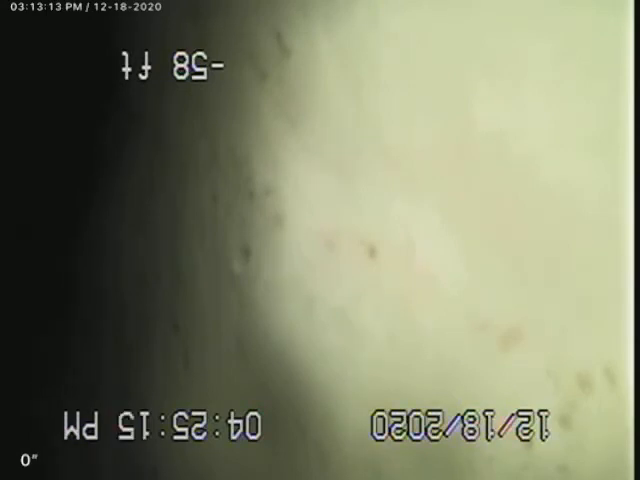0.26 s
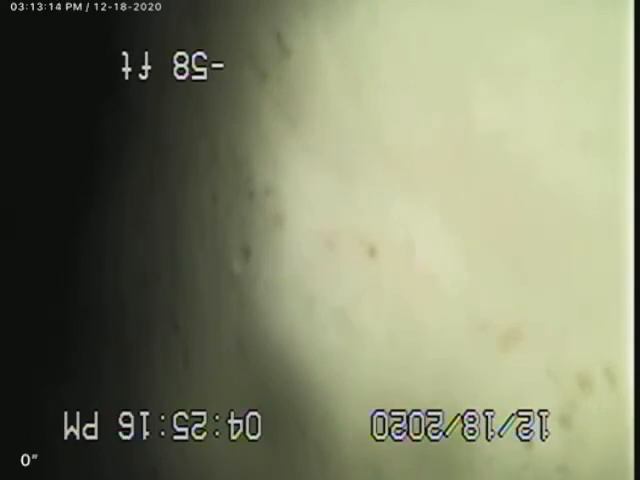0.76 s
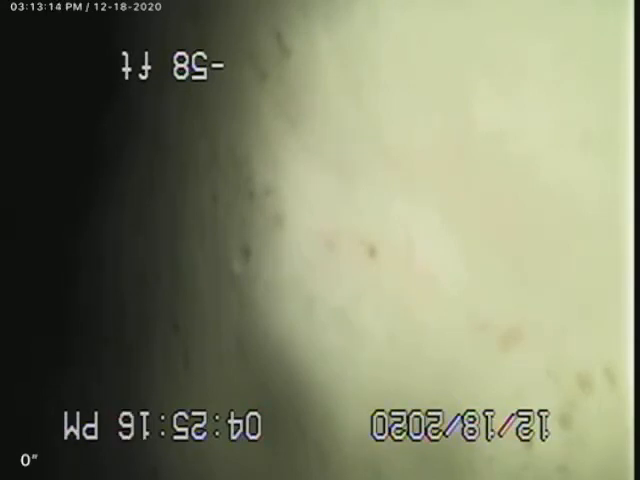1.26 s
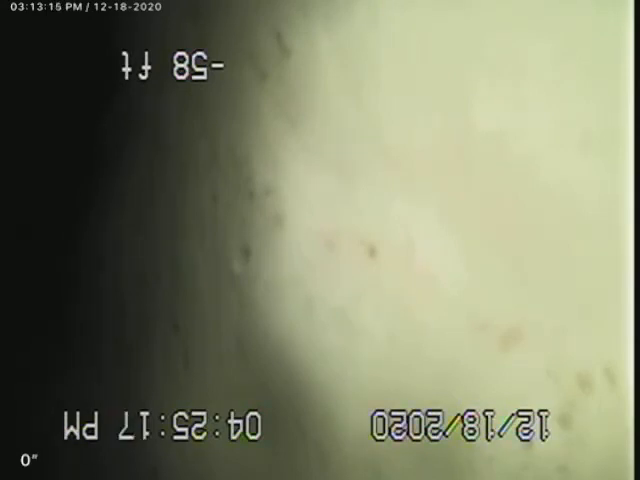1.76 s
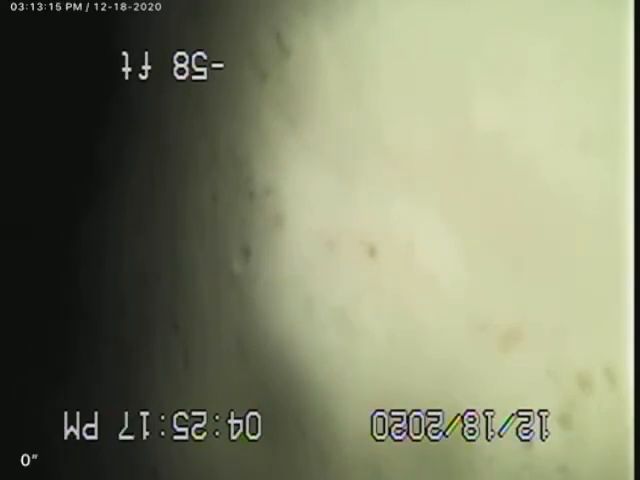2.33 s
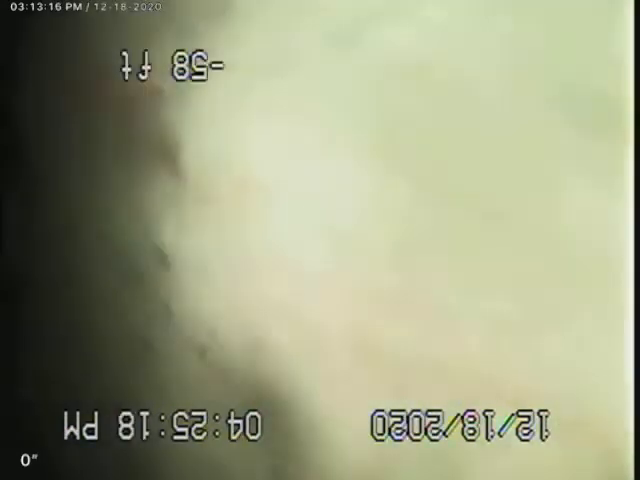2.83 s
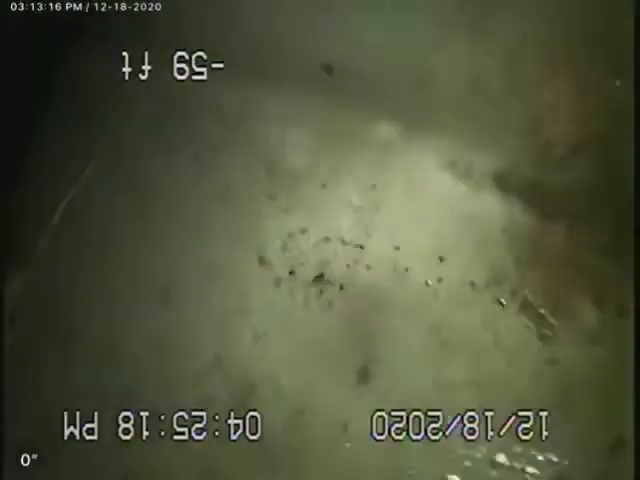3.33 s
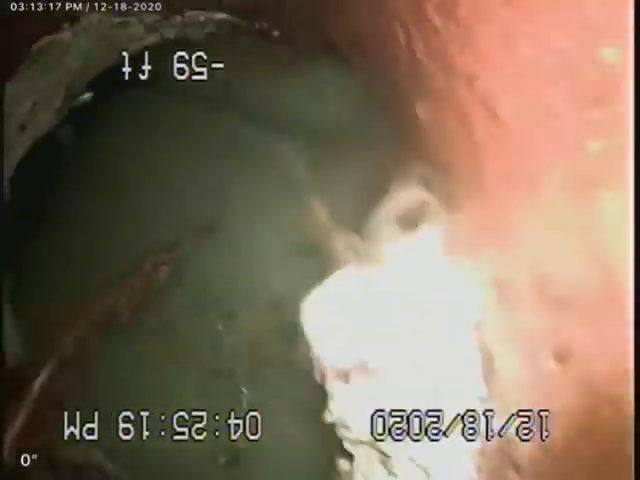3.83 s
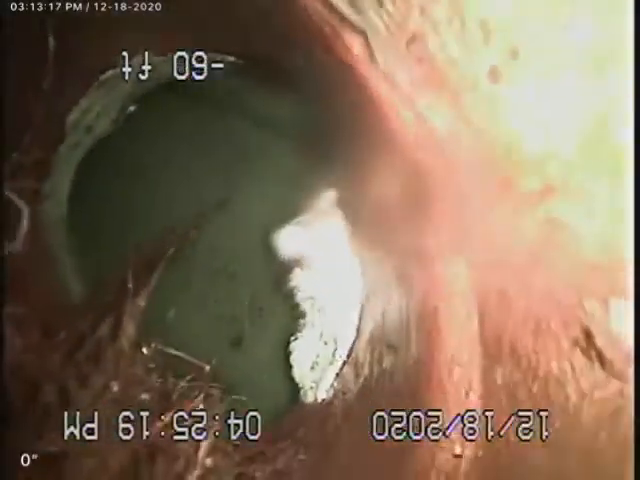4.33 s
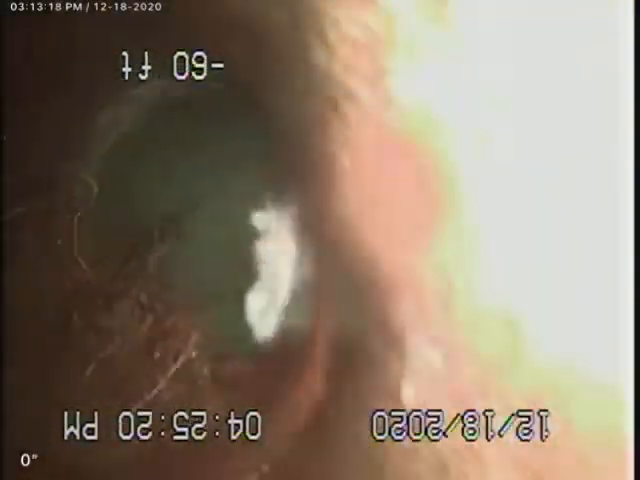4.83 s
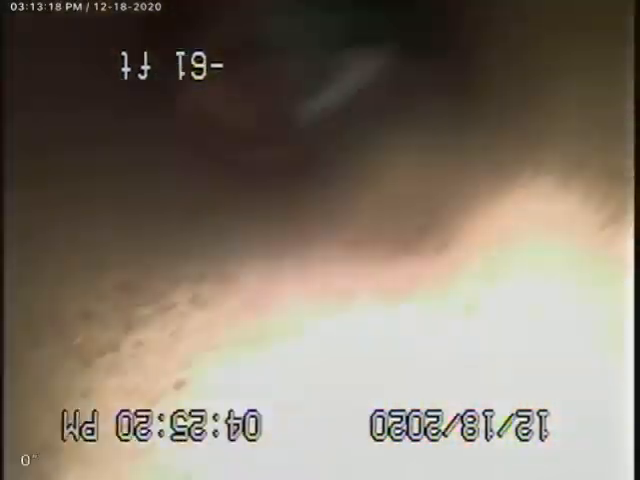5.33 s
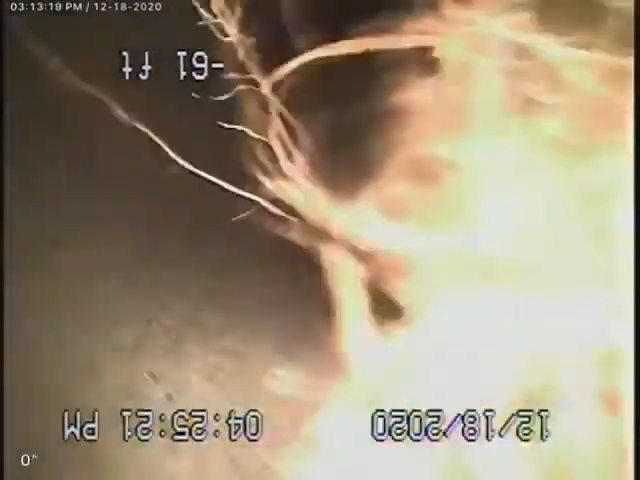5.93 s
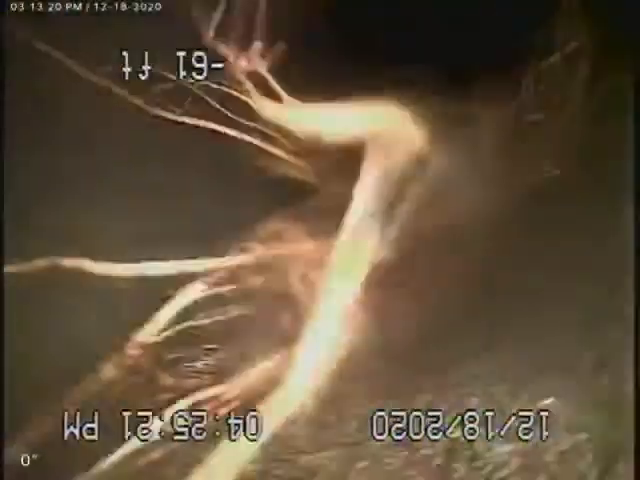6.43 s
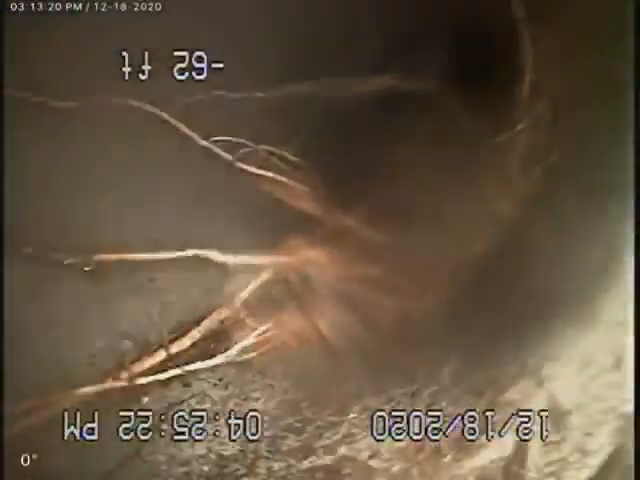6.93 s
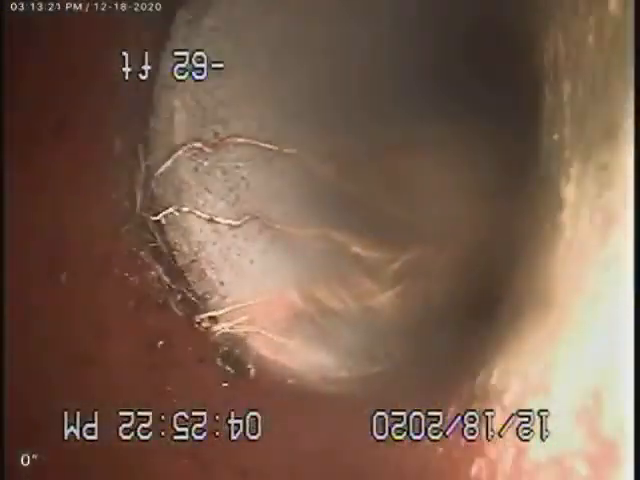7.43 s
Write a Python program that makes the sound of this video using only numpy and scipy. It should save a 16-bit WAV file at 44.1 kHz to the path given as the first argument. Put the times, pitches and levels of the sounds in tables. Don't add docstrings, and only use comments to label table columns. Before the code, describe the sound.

Sparse taps burst into hard clacks and a loud scrape, then hollow reel knocks and dull rubbing continue above a distant idling engine.

```python
import sys
import numpy as np
from scipy import signal
from scipy.fft import rfft, irfft
from scipy.io import wavfile
from scipy.ndimage import uniform_filter1d

SR = 44100
rng = np.random.default_rng(int(sys.argv[2]) if len(sys.argv) > 2 else 0)


def to_linear_factor(level_db):
    exponent = np.asarray(level_db, float) / 20
    return 10 ** exponent


def store_wav(level_fs):
    pcm = np.round(np.clip(np.atleast_2d(level_fs), -1, 1) * 32767)
    wavfile.write(sys.argv[1], SR, pcm.T.astype(np.int16))


N = 339129

# centre in Hz, width in Hz, level in dB.
FRAME_MODES = [(420, 144, -2), (560.6, 63, 4), (663.5, 58, 1), (939, 172, -0.5), (1203, 107, -2),
               (1385, 98, -1), (1590, 135, -5.5), (1800, 260, -6.5), (2265, 200, -7), (2500, 170, -9),
               (2865, 555, -8)]
DRUM_MODES = [(105.5, 14.4, -8.5), (152.7, 8.3, 1.5), (176.7, 12.4, 0.5), (211.4, 14, -5.5),
              (249, 31.5, -11.5), (304.8, 19.5, -5.5)]
GRIT_MODES = [(3505, 1640, -2.1), (4870, 760, 0.0026), (5670, 960, -2.4)]


def evened(x):
    return x / np.sqrt(np.mean(x ** 2) + 1e-20)


def levelled(x, window_s):
    size = int(window_s * SR)
    power = uniform_filter1d(uniform_filter1d(x ** 2, size), size)
    return x / np.sqrt(power + 1e-12)


def curves(rows, t_s):
    row_s, *columns = np.transpose(rows)
    return [np.interp(t_s, row_s, column) for column in columns]


def coloured(x, points):
    hz = np.fft.rfftfreq(len(x), 1 / SR)
    point_hz, point_db = np.transpose(points)
    gain_db = np.interp(np.log(hz + 1), np.log(point_hz + 1), point_db)
    return irfft(rfft(x) * to_linear_factor(gain_db), len(x))


def body(x, modes, pull_db=0):
    out = np.zeros(len(x))
    pulls_db = pull_db + np.zeros(len(modes))
    for k, ((hz, width_hz, db), more_db) in enumerate(zip(modes, pulls_db)):
        b, a = signal.iirpeak(hz, hz / width_hz, SR)
        out += (-1) ** k * to_linear_factor(db + more_db) * signal.lfilter(b, a, x)
    return out


def wander(per_s):
    steps = rng.standard_normal(int(N / SR * per_s) + 2)
    drift = np.interp(np.arange(N) * per_s / SR, np.arange(len(steps)), steps)
    return evened(uniform_filter1d(drift, int(SR / per_s)))


def grains(length, per_s, spread_db):
    slipping = rng.random(length) < per_s / SR
    size = np.minimum(rng.exponential(1, length), 4)
    return slipping * np.sign(rng.standard_normal(length)) * to_linear_factor(spread_db * size)


def add(mix, start_s, sound):
    part = mix[round(start_s * SR):][:len(sound)]
    part += sound[:len(part)]


def engine():
    # time in seconds, rate in Hz.
    shaft_rows = [(0, 16.4), (1.5, 16.25), (7.69, 16.22)]
    # multiple of the shaft rate, level in dB.
    order_rows = [(2, -44), (3, -56.5), (6, -52.5)]
    # tone in Hz, level in dB.
    auxiliary_rows = [(58.8, -55), (156, -56.5)]
    # time in seconds, tone in Hz, level in dB.
    fan_rows = [(0, 42, -54), (1.3, 43, -45), (2.7, 44, -61), (3.2, 44.5, -50), (5, 43, -54.5),
                (6.5, 41.6, -49.5), (7.69, 41, -54)]
    t_s = np.arange(N) / SR
    shaft_hz, = curves(shaft_rows, t_s)
    fan_hz, fan_db = curves(fan_rows, t_s)
    tones = [(order * shaft_hz, db) for order, db in order_rows]
    tones += [*auxiliary_rows, (fan_hz, fan_db)]
    out = np.zeros(N)
    for hz, db in tones:
        turns = np.cumsum(hz * (1 + .003 * wander(3))) / SR + rng.random()
        level = np.sqrt(2) * to_linear_factor(db + 1.1 * wander(2.32))
        out += level * np.sin(2 * np.pi * turns)
    return out


def air():
    # frequency in Hz, density in dB per Hz.
    air_colour = [(12, -9), (30, -1.5), (50, -2), (75, -15), (100, -8.5), (160, -17), (250, -26.5),
                  (350, -18.5), (500, -28.5), (1000, -25), (2100, -26.5), (4000, -36), (7000, -39)]
    noise = coloured(rng.standard_normal(N), air_colour)
    return to_linear_factor(-49.5 + 2.2 * wander(6)) * evened(noise)


def rub():
    # time in seconds, frame level in dB, drum level in dB, grit level in dB.
    rub_rows = [(0.0, -65, -53, -66), (0.38, -59, -58.5, -61), (0.77, -56, -57.5, -67),
                (1.35, -61, -55.5, -64.5), (1.48, -45.5, -47, -51), (1.65, -55.5, -48, -59.5),
                (1.77, -64.5, -60, -71), (1.97, -52, -54, -55), (2.05, -37.5, -43, -45),
                (2.18, -44.5, -39, -59.5), (2.23, -45.5, -41, -53), (2.4, -45, -42.5, -52),
                (2.74, -41.5, -41.5, -48), (2.87, -43.5, -47.5, -50.5), (3.04, -46.5, -40.5, -55.5),
                (3.17, -52.5, -57, -54.5), (3.3, -48, -49, -55), (3.53, -46, -38.5, -56),
                (3.62, -42, -35.5, -54.5), (3.75, -47.5, -54, -58.5), (3.83, -56, -57, -63.5),
                (4.05, -55, -54, -61.5), (4.26, -51.5, -51, -57.5), (4.37, -47, -44.5, -56),
                (4.5, -68, -47, -64.5), (4.73, -47.5, -50, -58), (4.86, -44, -42, -55),
                (4.9, -45.5, -38.5, -52), (5.03, -49.5, -51, -53.5), (5.37, -47, -45, -58),
                (5.46, -53, -43.5, -59), (5.59, -50, -57, -67), (5.85, -57, -48, -54),
                (6.0, -46.5, -45, -59.5), (6.06, -46.5, -45.5, -56), (6.19, -49, -41, -59),
                (6.3, -53.5, -57, -58.5), (6.51, -58, -52.5, -64.5), (6.81, -55.5, -52.5, -60.5),
                (6.94, -49, -47, -69), (7.11, -51, -54, -55), (7.35, -46.5, -46, -65),
                (7.5, -53.5, -44, -58.5), (7.69, -49, -56.5, -60.5)]
    frame_db, drum_db, grit_db = curves(rub_rows, np.arange(N) / SR)
    slips = grains(N, 1500, 1.8) * to_linear_factor(1.5 * wander(60))
    ringing = np.zeros(N)
    for k, mode in enumerate(FRAME_MODES):
        ringing += (-1) ** k * to_linear_factor(3.16 * wander(12)) * body(slips, [mode])
    frame = to_linear_factor(frame_db - 2.5) * levelled(ringing, 0.06)
    drum = to_linear_factor(drum_db - 0.5) * levelled(body(slips, DRUM_MODES), 0.071)
    grit = to_linear_factor(grit_db - 2.0) * evened(body(grains(N, 9000, .8), GRIT_MODES))
    return frame + drum + grit


def knock(row, damping):
    start_s, peak_db, ring_hz, thud_db, tick_db, t60_s = row
    t_s = np.arange(8000) / SR
    decay = to_linear_factor(-60 * t_s / max(t60_s, .01))
    rattle = grains(len(t_s), 5000, 4.1) * decay * np.minimum(t_s / 0.0022, 1)
    rattle[30] += 4.0
    near_db = -5.0 * abs(np.log2(np.array(FRAME_MODES)[:, 0] / ring_hz))
    ring = body(rattle, FRAME_MODES, near_db) + body(rattle, [(ring_hz, 0.11 * ring_hz, 1.5)])
    crack = body(rattle * to_linear_factor(-60 * t_s / 0.025), [(1340, 912, -4.0), (2340, 920, -10.0)])
    soft = signal.lfilter(*signal.butter(2, 2000 + ring_hz, fs=SR), ring + crack)
    damped_drum = np.array(DRUM_MODES) * [1, damping, 1]
    thud = body(rattle, damped_drum, 0.55 * rng.standard_normal(len(DRUM_MODES)))
    tick = body(rattle, GRIT_MODES)
    parts = ((soft, peak_db), (thud, thud_db - 0.5), (tick, tick_db + 0.5))
    return start_s - 30 / SR, sum(to_linear_factor(db) * part / abs(part).max() for part, db in parts)


def push(peak_db, pulse_hz):
    cycles = np.arange(4000) / SR * pulse_hz
    envelope = np.exp(-1.2 * cycles) * np.minimum(4 * cycles, 1)
    return to_linear_factor(peak_db) * np.sin(2 * np.pi * cycles) * envelope


def knocks():
    # time in seconds, peak in dB, brightest ring in Hz, thud in dB,
    # tick above 3 kHz in dB, ring t60 in seconds.
    tap_rows = [(0.159, -42, 546, -53, -38, 0.12), (0.418, -55, 2110, -54, -54, 0.04),
                (0.662, -42.5, 1140, -52, -43, 0.03), (0.795, -48, 1320, -50, -63, 0.048),
                (0.938, -21, 2130, -29.5, -43, 0.017), (0.988, -30.5, 2800, -40, -48, 0.03),
                (1.035, -49, 1050, -48, -41, 0.04), (1.055, -34, 2110, -44, -53, 0.049),
                (1.295, -23.5, 2470, -41, -39, 0.04), (1.309, -19.5, 520, -46, -33, 0.04),
                (1.318, -25.5, 1080, -25, -29, 0.027), (1.33, -18, 1200, -38, -22, 0.044),
                (1.355, -15, 1940, -22, -38, 0.029), (1.376, -22.5, 417, -21, -31, 0.014),
                (1.479, -30, 1450, -45, -29.5, 0.019), (1.514, -41, 550, -33.5, -37, 0.042),
                (1.736, -40, 2130, -48, -49, 0.065), (2.017, -19, 401, -17.5, -46, 0.024),
                (4.704, -35, 480, -29, -44, 0.059), (4.763, -26.5, 590, -27, -54, 0.044),
                (4.964, -38, 1600, -38, -38, 0.046), (7.099, -41, 2930, -44, -41, 0.04)]
    knock_rows = [(2.048, -9, 590, -19.5, -27.5, 0.088), (2.1, -21, 1250, -21, -45, 0.045),
                  (2.22, -21, 1540, -19.5, -35, 0.057), (2.289, -34, 1560, -56, -46.5, 0.071),
                  (2.312, -21.5, 1740, -23, -54, 0.071), (2.535, -45, 974, -54, -48, 0.069),
                  (2.549, -42, 1330, -44, -37, 0.094), (2.65, -20.5, 1880, -47, -35, 0.066),
                  (2.737, -33.5, 641, -30.5, -46, 0.092), (2.824, -19, 1800, -31.5, -47, 0.057),
                  (3.023, -36, 543, -37, -50, 0.08), (3.208, -41, 1130, -37, -60, 0.087),
                  (3.239, -38.5, 855, -41, -63, 0.06), (3.322, -47, 450, -66, -42, 0.06),
                  (3.34, -36, 520, -33, -59, 0.098), (3.387, -18.5, 573, -24, -60, 0.094),
                  (3.449, -27.5, 860, -32.5, -37, 0.072), (3.525, -32.5, 614, -36, -58, 0.055),
                  (3.56, -37, 530, -54, -51, 0.074), (3.597, -33, 527, -44, -44, 0.06),
                  (3.661, -30, 568, -32, -64, 0.086), (3.7, -20, 610, -22, -58, 0.032),
                  (3.874, -54, 549, -46, -59, 0.07), (4.107, -46.5, 1390, -60, -57, 0.06),
                  (4.131, -44, 1070, -50, -48, 0.06), (4.223, -50, 816, -50, -46, 0.054),
                  (4.237, -41, 1140, -41, -47, 0.12), (4.264, -37, 685, -48, -55, 0.11),
                  (4.384, -36.5, 503, -41, -50, 0.12), (4.44, -29.5, 1020, -44, -49, 0.063),
                  (4.441, -31, 880, -40, -54, 0.087), (4.499, -38, 482, -46, -52, 0.092),
                  (4.539, -42, 1100, -48, -63, 0.063), (4.69, -35, 579, -30.5, -51, 0.076),
                  (4.734, -17, 646, -20.5, -57, 0.05), (4.799, -35, 710, -41, -49, 0.048),
                  (4.922, -25.5, 660, -31.5, -44, 0.02), (5.247, -48, 807, -44, -52, 0.071),
                  (5.533, -39, 634, -33.5, -58, 0.064), (5.565, -36, 624, -33, -56, 0.1),
                  (5.803, -42.5, 1390, -52, -57, 0.12), (5.835, -39, 480, -44, -45, 0.11),
                  (5.874, -24, 865, -32, -44, 0.097), (6.045, -44, 1030, -62, -49, 0.067),
                  (6.067, -38, 1010, -29, -52, 0.044), (6.112, -35, 568, -27.5, -56, 0.031),
                  (6.342, -48, 635, -46, -49, 0.076), (6.519, -41.5, 1080, -50, -53, 0.1),
                  (6.712, -42, 636, -45, -51, 0.068), (6.75, -39.5, 651, -33, -45, 0.055),
                  (6.898, -42, 681, -36, -59, 0.06), (6.959, -31.5, 664, -32.5, -61, 0.11),
                  (7.052, -36.5, 598, -33, -61, 0.065), (7.068, -34, 475, -36, -43, 0.068),
                  (7.282, -39, 420, -36.5, -49, 0.066), (7.309, -29.5, 417, -26, -57, 0.065),
                  (7.513, -39, 2580, -55, -39, 0.085), (7.65, -31, 494, -25, -47, 0.1)]
    # time in seconds, peak in dB, pulse in Hz.
    push_rows = [(0.584, -28, 250), (0.592, -38, 503), (.597, -20, 400), (.613, -31, 450), (.623, -24, 300),
                 (0.93, -24, 200), (0.944, -20.5, 180), (1.087, -23.5, 60), (1.377, -20, 450),
                 (1.383, -22, 130), (1.421, -28, 60), (2.019, -8, 700), (2.025, -33, 90),
                 (2.064, -15.5, 130), (2.22, -20.5, 70), (2.749, -23.5, 200), (3.399, -23.5, 90)]
    out = np.zeros(N)
    for row in tap_rows:
        add(out, *knock(row, damping=7.7))
    for row in knock_rows:
        add(out, *knock(row, damping=0.75))
    for start_s, peak_db, pulse_hz in push_rows:
        add(out, start_s, push(peak_db, pulse_hz))
    return out


def slide(rows, colour):
    t_s = np.arange(rows[0][0], rows[-1][0], 1 / SR)
    scrape_db, grit_db, drum_db = curves(rows, t_s)
    bunches = evened(uniform_filter1d(rng.standard_normal(len(t_s)), 110))
    slips = grains(len(t_s), 4000, 3.1) * to_linear_factor(2.67 * bunches)
    scrape = to_linear_factor(scrape_db - 4.0) * evened(coloured(slips, colour))
    grit = to_linear_factor(grit_db + 1.0) * evened(body(slips, GRIT_MODES))
    held_drum = np.array(DRUM_MODES) * [1, 3.0, 1]
    drum = to_linear_factor(drum_db - 4.0) * evened(body(slips, held_drum))
    return t_s[0], (scrape + grit + drum) * signal.windows.tukey(len(t_s), .1)


def slides():
    # time in seconds, scrape in dB, grit in dB, drum in dB.
    slide_tables = [
        [(0.548, -58, -59, -67), (0.562, -48, -41.5, -48), (0.586, -44, -48, -38), (0.622, -46, -53, -44),
         (0.635, -51, -60, -38)],
        [(0.928, -43, -60, -39), (0.94, -39, -40.5, -37), (0.955, -51, -53, -29)],
        [(0.97, -49, -58, -47), (0.994, -45, -49.5, -38), (1.01, -51, -56.5, -52), (1.086, -43, -53, -43),
         (1.105, -53, -59, -60)],
        [(1.288, -56, -50, -42), (1.298, -25, -41, -35), (1.36, -32, -32.5, -38), (1.368, -43, -39, -32),
         (1.38, -17, -47, -19)],
        [(2.218, -40, -59, -32), (2.222, -32.5, -54, -27), (2.248, -33.5, -41.5, -40), (2.258, -59, -52, -33)],
        [(2.645, -41, -52, -48), (2.651, -45, -36, -46), (2.683, -40, -51, -50), (2.71, -33, -46, -28)],
    ]
    roll_tables = [
        [(4.428, -43, -58, -44), (4.444, -36, -53.5, -39.5), (4.465, -45, -64, -39)],
        [(5.53, -46, -60, -42), (5.55, -47, -59, -43), (5.566, -44.5, -57, -35), (5.604, -44, -57, -38),
         (5.64, -47, -63, -46)],
        [(5.865, -39, -56, -43), (5.879, -35, -52, -37), (5.905, -46.5, -61, -31)],
        [(6.04, -51, -57, -44), (6.058, -50, -59, -48), (6.074, -38, -63, -39), (6.09, -47, -56, -42)],
        [(6.1, -53, -58, -40), (6.116, -43, -58, -36), (6.142, -42.5, -61, -28), (6.198, -51, -61, -46),
         (6.22, -38, -60, -53)],
        [(6.89, -50, -63, -54), (6.906, -53, -66, -46), (6.956, -47, -61, -45), (6.99, -48, -64, -42),
         (7.03, -47, -60, -56)],
        [(7.3, -51, -61, -38), (7.31, -42, -54, -32), (7.316, -40.5, -61, -31.5), (7.396, -41.5, -59, -39.5),
         (7.43, -56, -62, -39)],
    ]
    # frequency in Hz, density in dB per Hz.
    slide_colour = [(200, 0), (500, 2.5), (800, 3), (1200, 2), (1900, -1), (2700, 3), (3600, -36),
                    (7000, -27.5)]
    roll_colour = [(250, -9.5), (420, -3), (600, 4.5), (780, -2), (1100, 1.5), (1600, -7.5), (2300, -12),
                   (3600, -26), (7000, -38.5)]
    out = np.zeros(N)
    for rows in slide_tables:
        add(out, *slide(rows, slide_colour))
    for rows in roll_tables:
        add(out, *slide(rows, roll_colour))
    return out


def room(x):
    t_s = np.arange(SR // 4) / SR
    tail = np.roll(grains(len(t_s), 2000, 0) * to_linear_factor(-60 * t_s / 0.19), 200)
    tail = signal.lfilter(*signal.butter(1, 2500, fs=SR), tail)
    return signal.fftconvolve(x, tail / np.linalg.norm(tail))[:N]


def scene():
    rod = knocks() + slides()
    return (rod + to_linear_factor(-17) * room(rod) + rub() + engine() + air())[None]


def band_limit(x):
    return signal.sosfilt(signal.butter(12, 7430, fs=SR, output="sos"), x)


def record(dry):
    rounded = .6 * np.tanh(dry / .6)
    hz, t_s, z = signal.stft(rounded, SR, nperseg=2048, noverlap=1536)
    hz = hz[:, None]
    edge_hz = 6850 + 110 * uniform_filter1d(rng.standard_normal(len(t_s)), 3) * np.sqrt(3)
    kept = np.clip((edge_hz - hz) / 350 + .5, 0, 1) ** 3
    chance = rng.random((65, len(t_s) // 3 + 1))
    chance = np.repeat(np.repeat(chance, 16, 0), 3, 1)[:len(hz), :len(t_s)]
    holes = (chance < .012) & (hz > 3300)
    z = z * kept * np.where(holes, to_linear_factor(-27.5), 1)
    mix = signal.istft(z, SR, nperseg=2048, noverlap=1536)[1][:, :N]
    return band_limit(mix)


dry = scene()
out = record(dry)
store_wav(out)
```